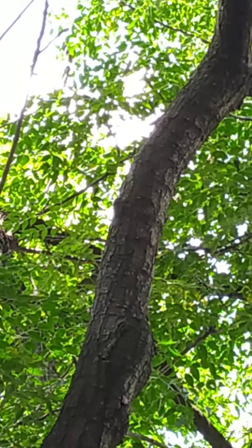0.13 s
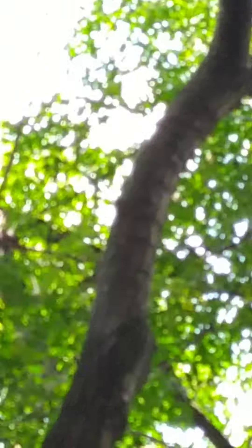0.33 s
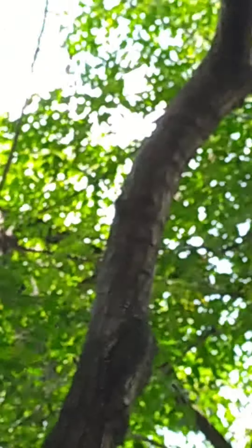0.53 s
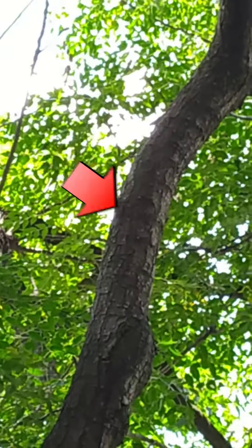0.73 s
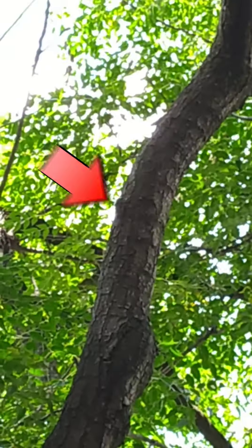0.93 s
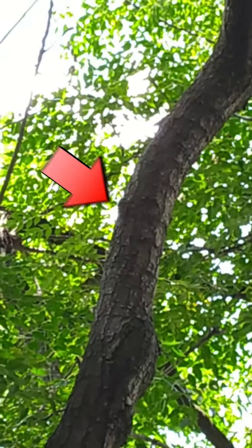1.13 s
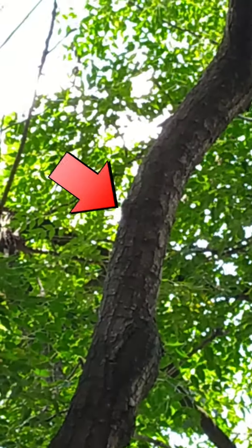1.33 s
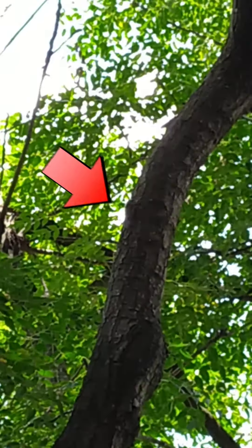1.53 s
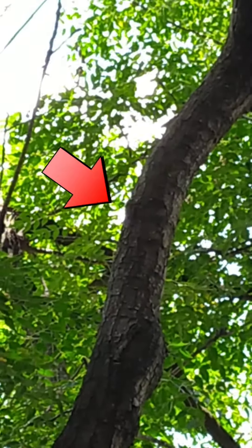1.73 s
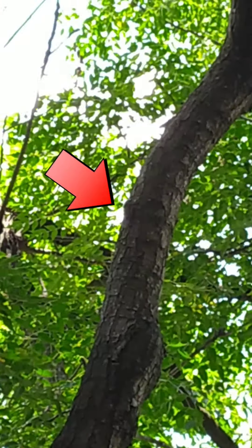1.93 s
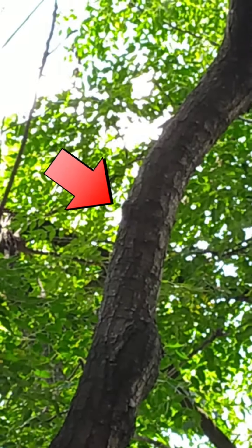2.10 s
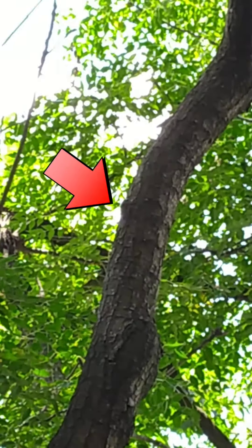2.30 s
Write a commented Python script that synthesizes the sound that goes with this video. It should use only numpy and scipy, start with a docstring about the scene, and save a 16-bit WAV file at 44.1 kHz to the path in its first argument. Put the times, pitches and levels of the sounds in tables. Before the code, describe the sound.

A cicada rasps overhead in a shrill, rapid, even pulse, with faint outdoor background.

```python
"""A cicada rasps from a tree trunk overhead, chanting about four syllables a second.
Each is a burst of tymbal clicks: the hollow abdomen rings and glides upward, then the shrill
membranes swell. Twigs and canopy scatter the call on its way down to a stereo pair of microphones.
Behind it lie a far chorus, a low outdoor rumble and the faint hum of a distant machine."""
import sys
import numpy as np
from scipy import signal
from scipy.fft import rfft, irfft, next_fast_len
from scipy.io import wavfile
from scipy.ndimage import uniform_filter1d

SR = 44100
rng = np.random.default_rng(int(sys.argv[2]) if len(sys.argv) > 2 else 0)


def master(y):
    """Save y as 16-bit WAV."""
    cut = np.clip(np.atleast_2d(y).T, -1, 1)
    pcm = np.round(cut * 32767)  # scale
    wavfile.write(sys.argv[1], SR, pcm.astype(np.int16))


N = 108486
LEAD_S, SYLLABLE_S = 0.045, 0.28  # clicking starts this long before the shrill onset; its whole length


def amp(db):
    """Decibels to gain."""
    return 10 ** (np.asarray(db) / 20)


def unit(x):
    """Scales to rms 1."""
    return x / np.sqrt(np.mean(x ** 2) + 1e-20)


def read(points, hz):
    """Reads a table on a log-frequency axis."""
    f, value = np.transpose(points)
    return np.interp(np.log(hz + 1), np.log(f + 1), value)


def sides(left_db):
    """Microphone gains that put the left this far above the right."""
    return amp(np.array([[.5], [-.5]]) * left_db)


def add(mix, start_s, sound):
    """Mixes a sound in at a time."""
    at = round(start_s * SR)
    sound = sound[max(-at, 0):]
    part = mix[max(at, 0):][:len(sound)]
    part += sound[:len(part)]


def colour(x, points):
    """Minimum-phase filter with the given spectrum."""
    log_gain = np.log(amp(read(points, abs(np.fft.fftfreq(2048, 1 / SR)))))
    taps = np.fft.ifft(np.exp(np.conj(signal.hilbert(log_gain)))).real
    return signal.oaconvolve(x, taps)[:len(x)]


def resonate(x, hz, width_hz):
    """A resonance of gain 1 that follows the curve hz."""
    turn = np.exp(2j * np.pi * np.cumsum(hz) / SR)
    pole = np.exp(-np.pi * width_hz / SR)
    return 2 * (turn * signal.lfilter([1 - pole], [1, -pole], x / turn + 1e-18)).real


def swell(t, full_s, hold_s, rise_db_s, fall_db_s):
    """Attack, hold and release, with slopes in dB per second."""
    return amp(-rise_db_s * np.maximum(full_s - t, 0) - fall_db_s * np.maximum(t - full_s - hold_s, 0))


def tymbal(length, count=400, clicks_per_s=1400, jitter=0.17, spread_db=4):
    """Ribs buckle one after another in clicks of uneven timing and strength."""
    slip, size = rng.standard_normal((2, count))
    at = np.round((np.arange(count) + jitter * slip) / clicks_per_s * SR).astype(int)
    inside = (at >= 0) & (at < length)
    return unit(np.bincount(at[inside], amp(spread_db * size[inside]), length))


def abdomen(clicks, t, head_start_s, width_hz=373, steady_s=0.0046):
    """The hollow abdomen rings smoothly under the clicks; its pitch climbs, then sags."""
    # abdomen resonance, timed from the shrill onset: time_s, pitch_hz
    pitch_curve = [(-.035, 2440), (-.02, 2470), (0, 2720), (.015, 2820), (.06, 2580)]
    hz = np.interp(t, *np.transpose(pitch_curve))
    ring = resonate(resonate(clicks, hz, width_hz), hz, width_hz)
    ring /= np.sqrt(abs(uniform_filter1d(ring ** 2, round(steady_s * SR))) + 1e-12)
    ring *= swell(t + head_start_s, full_s=-0.024, hold_s=0.01, rise_db_s=1500, fall_db_s=288)
    return amp(-50) * unit(ring)


def glides(clicks, t):
    """Brief overtones sweep upward as the abdomen stretches."""
    # overtones, timed from the shrill onset: peak_s, pitch_hz, glide_hz_per_s, width_hz, spread_s, level_db
    overtones = [(-.015, 2840, 11900, 424, 0.015, -52.5), (-.005, 3650, 32800, 786, 0.0097, -52.5),
                 (.001, 6300, 18000, 655, 0.013, -52)]
    out = np.zeros(len(t))
    for peak_s, hz, hz_per_s, width_hz, spread_s, db in overtones:
        track = hz + hz_per_s * np.clip(t - peak_s, -2 * spread_s, 2 * spread_s)
        ring = resonate(resonate(clicks, track, width_hz), track, width_hz)
        out += amp(db) * unit(ring * np.exp(-.5 * ((t - peak_s) / spread_s) ** 2))
    return out


def rasp(clicks, t):
    """A softer buzz of clicks that swells just ahead of the shrill part."""
    # colour of the rasp: frequency_hz, gain_db
    spectrum = [(1200, -39.5), (2200, -24.5), (2900, -15), (3250, 0.5), (3700, -6.5), (4800, -0.5),
                (6500, 0), (7400, -4), (9000, 4.5), (12000, -21)]
    soft_clicks = clicks * swell(t, full_s=-0.0088, hold_s=0.031, rise_db_s=802, fall_db_s=336)
    return amp(-43.5) * unit(colour(soft_clicks, spectrum))


def membranes(hard_clicks):
    """The membranes turn the clicks shrill at full stretch."""
    # colour of the taut membranes: frequency_hz, gain_db
    spectrum = [(3000, -38.5), (5500, -19), (6700, -3), (7400, -15.5), (8000, -5), (8400, -8), (9000, 0),
                (9800, -1), (10500, -0.5), (11300, -14), (12100, -18), (12800, -30)]
    return amp(-34) * unit(colour(hard_clicks, spectrum))


def steady_tones(hard_clicks):
    """Thin steady tones ring at fixed pitches during the shrill part."""
    # narrow steady tones: pitch_hz, width_hz, level_db
    modes = [(2897, 48, -56), (4180, 20, -62), (5265, 37, -61.5), (5820, 44, -55), (6476, 50, -56.5),
             (6810, 42, -63), (8840, 46, -50), (10445, 70, -50.5)]
    return sum(amp(db) * unit(resonate(hard_clicks, np.full(len(hard_clicks), hz), width_hz))
               for hz, width_hz, db in modes)


def syllable(buzz_db, ring_db, head_start_s):
    """One burst of clicks drives the ringing abdomen, the steady tones and the buzz; t = 0 is the shrill onset."""
    t = np.arange(-LEAD_S, SYLLABLE_S - LEAD_S, 1 / SR)
    clicks = tymbal(len(t))
    hard_clicks = clicks * swell(t, full_s=0.005, hold_s=0.024, rise_db_s=943, fall_db_s=385)
    ringing = abdomen(clicks, t, head_start_s) + steady_tones(hard_clicks)
    buzz = glides(clicks, t) + rasp(clicks, t) + membranes(hard_clicks)
    return amp(ring_db) * ringing + amp(buzz_db) * buzz


def echoes(t60_s, length, taps_per_s=4000):
    """Sparse dying reflections of energy 1, different at each microphone."""
    t = np.arange(length) / SR
    taps = rng.choice([-1., 1.], (2, length)) * (rng.random((2, length)) < taps_per_s / SR)
    taps *= amp(-60 * t / t60_s)
    return taps / np.linalg.norm(taps, axis=1, keepdims=True)


def twigs(x, left_delay_s=0.0003615, corner_hz=2730, evenness=0.89):
    """Direct sound plus a quick scatter off nearby twigs and leaves, drawn anew for each syllable."""
    size = next_fast_len(len(x) + SR // 20)
    hz = np.fft.rfftfreq(size, 1 / SR)
    direct = np.exp(-2j * np.pi * hz * np.array([[left_delay_s], [0]]))
    treble = hz ** 2 / (hz ** 2 + corner_hz ** 2)  # longer waves pass the twigs by
    response = direct + amp(6.5) * rfft(echoes(t60_s=0.044, length=SR // 20), size) * treble
    response /= (abs(response) + 1e-9) ** evenness  # smears the clicks while barely colouring them
    response /= np.sqrt(np.mean(abs(response) ** 2, 1, keepdims=True))
    return irfft(rfft(x, size) * response, size)


def cicada():
    """The cicada overhead chants syllable by syllable, heard through the twigs."""
    # the chant: shrill_onset_s, buzz_gain_db, ring_gain_db, ring_head_start_s
    syllables = [(0.028, -1.3, 2, 0.5), (.26, -1.5, -1, -0.00069), (0.493, -1, 0.5, -0.0016),
                 (.727, -1, -0.5, 0.0039), (0.959, -2.4, 4.5, 1), (1.192, -1.3, .5, -0.0011),
                 (1.424, -1.5, -1, 0.0025), (1.654, -1.5, -0.5, 0.0035), (1.886, -1.5, -1, -0.0045),
                 (2.117, -2.5, -0.5, 0.0041), (2.341, -2.5, -1, 0.00018)]
    out = np.zeros((2, N))
    for onset_s, buzz_db, ring_db, head_start_s in syllables:
        for side, sound in zip(out, twigs(syllable(buzz_db, ring_db, head_start_s))):
            add(side, onset_s - LEAD_S, sound)
    return out


def canopy(x, tail_db=-2):
    """The leaves of the canopy return a longer tail."""
    tail = signal.fftconvolve(x, echoes(t60_s=0.42, length=SR // 2), axes=1)[:, :N]
    return (x + amp(tail_db) * tail) / np.hypot(1, amp(tail_db))


def chorus(hz):
    """Far cicadas blur into a steady hiss."""
    # colour of the far chorus: frequency_hz, gain_db
    spectrum = [(1800, -22), (2700, -21), (3250, -19), (3800, 16), (5000, -6), (6600, 9), (7400, 2),
                (9000, 4), (10500, -14), (12000, -42), (13000, -35)]
    noise = rfft(rng.standard_normal((2, N)))
    return amp(-56.5) * unit(irfft(noise * amp(read(spectrum, hz)), N))


def rumble(hz):
    """Low outdoor background, nearly the same at both microphones in the bass."""
    # colour of the rumble and of its faint hiss: frequency_hz, gain_db
    lows = [(15, -33), (24, -8.5), (37, 0), (50, -11.5), (62, -6.5), (85, -11.5), (160, -2.5), (205, -5),
            (270, -3.5), (350, -7.5), (600, -12.5), (1100, -13), (1450, -19.5), (2000, -20.5)]
    highs = [(4000, -26), (12000, -29.5)]
    # likeness of left and right: frequency_hz, correlation
    likeness = [(30, 0.93), (130, 0.76), (350, 0.86), (700, 0.24), (1400, 0.027), (5000, 0.07)]
    left, independent = rfft(rng.standard_normal((2, N)))
    shared = read(likeness, hz)
    right = shared * left + np.sqrt(1 - shared ** 2) * independent
    pair = np.array([left, right]) * amp(read(list(lows) + list(highs), hz))
    return amp(-42.5) * unit(irfft(pair, N)) * sides(left_db=4.5)


def machine_hum(waver_hz=7, count=20):
    """A distant machine, off to the left, hums in tones that waver in level and phase."""
    # tones of the machine: pitch_hz, level_db, waver_depth
    tones = [(166.6, -55.5, 0.67), (247.8, -50.5, 0.38), (376.6, -63, 0.2), (561.8, -57.5, 0.2),
             (625.5, -61.5, 0.5), (1006, -63.5, 0.6), (1252, -65, 0.46)]
    t, out = np.arange(N) / SR, np.zeros(N)
    coarse_t = np.linspace(0, N / SR, 400)
    for hz, db, depth in tones:
        rate_hz, phase = rng.standard_normal((count, 1)) * waver_hz, rng.random((count, 1))
        waver = np.exp(2j * np.pi * (rate_hz * coarse_t + phase)).sum(0) / np.sqrt(count)
        tone = np.exp(2j * np.pi * (hz * t + rng.random()))
        out += amp(db) * unit(((1 + depth * np.interp(t, coarse_t, waver)) * tone).real)
    return out * sides(left_db=6)


def scene():
    """Under the tree: the insects, brighter in the left microphone, over the background."""
    # stereo balance of the insects: frequency_hz, left_minus_right_db
    balance = [(2400, 4.5), (3200, -2.5), (6500, 0), (8000, 0.5), (9500, 6), (10500, 4), (11500, 15.5),
               (12800, 5)]
    hz = np.fft.rfftfreq(N, 1 / SR)
    insects = rfft(canopy(cicada()) + chorus(hz)) * sides(read(balance, hz))
    return irfft(insects, N) + rumble(hz) + machine_hum()


def record(dry):
    """The recorder cuts off the highest treble."""
    edge_hz = 12834
    lowpass = signal.firwin(301, edge_hz, window=("kaiser", 9), fs=SR)
    return signal.oaconvolve(dry, lowpass[None], "same")


dry = scene()
out = record(dry)
master(out)
```